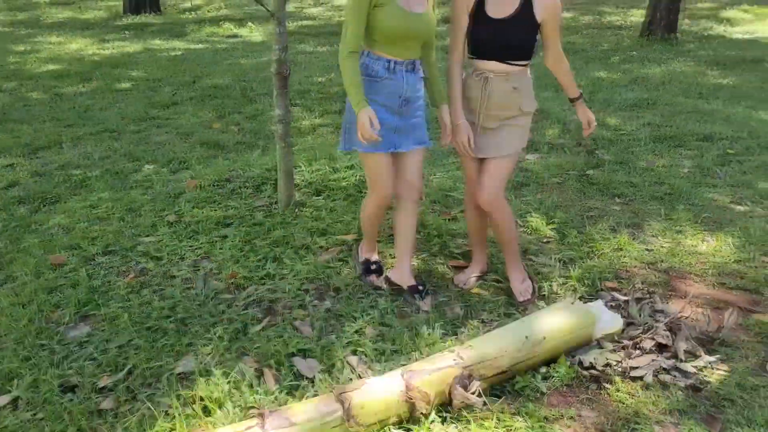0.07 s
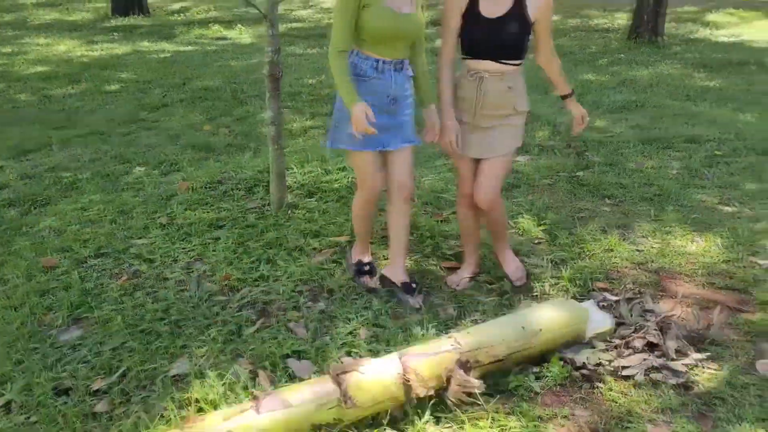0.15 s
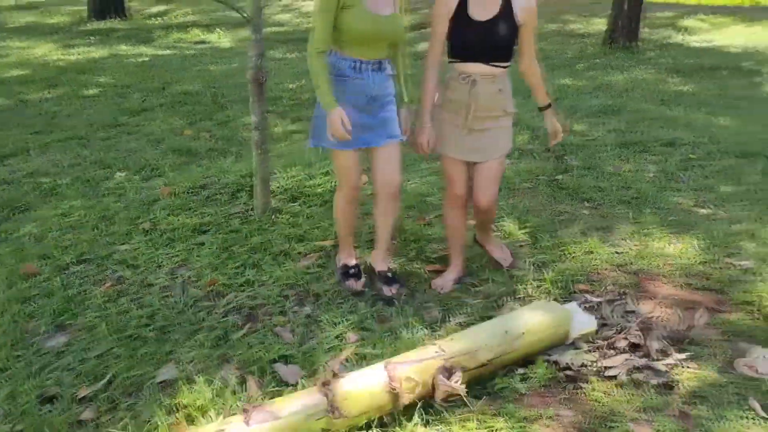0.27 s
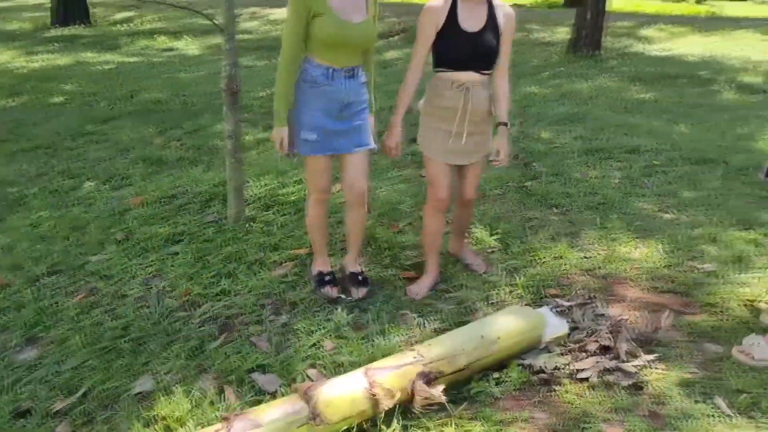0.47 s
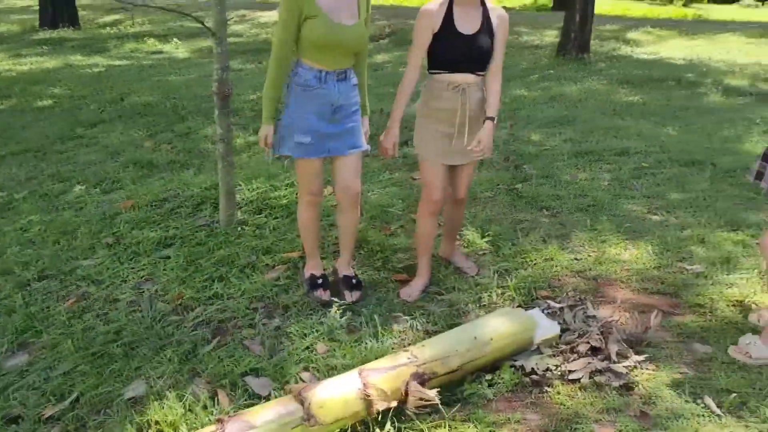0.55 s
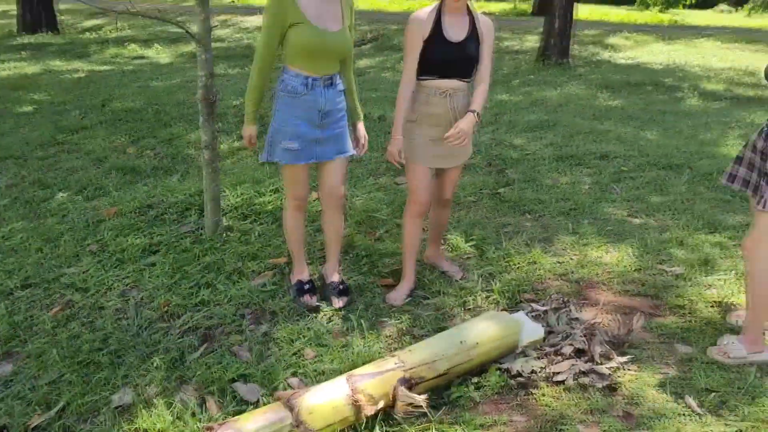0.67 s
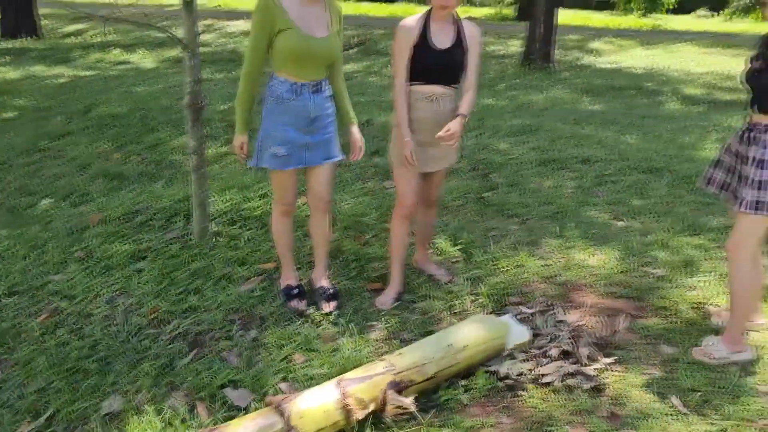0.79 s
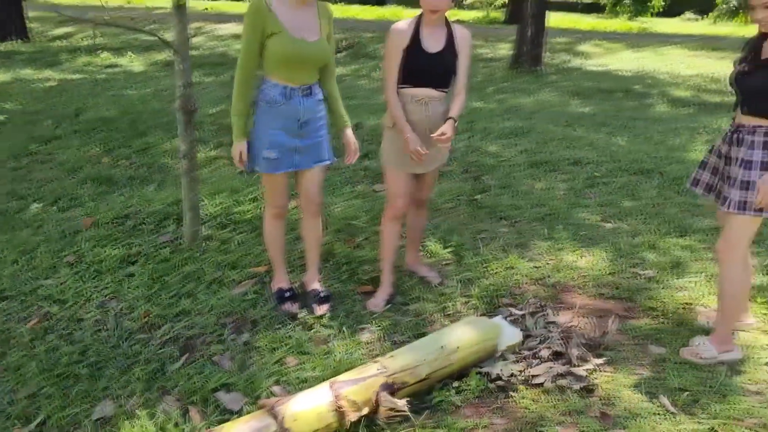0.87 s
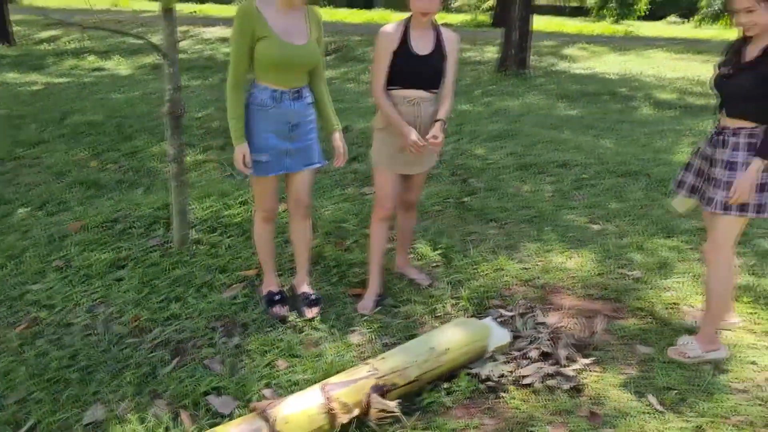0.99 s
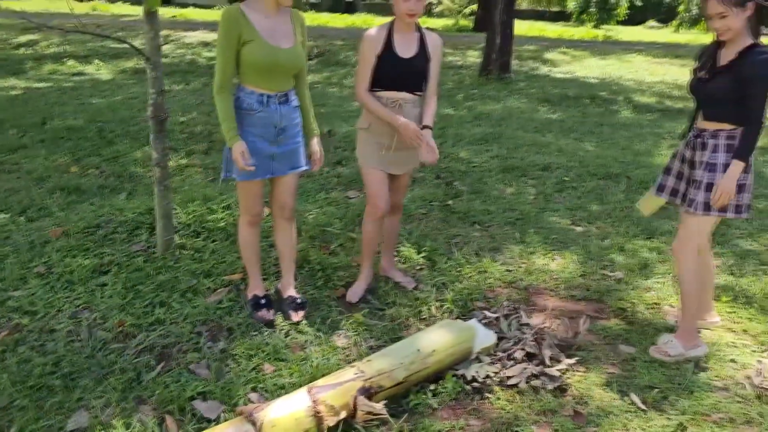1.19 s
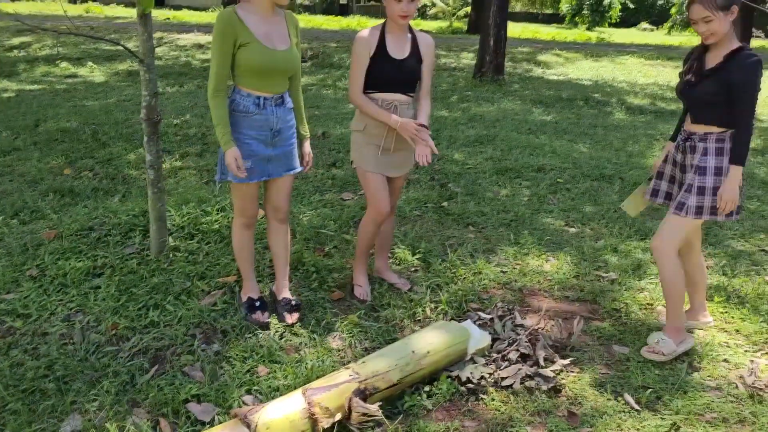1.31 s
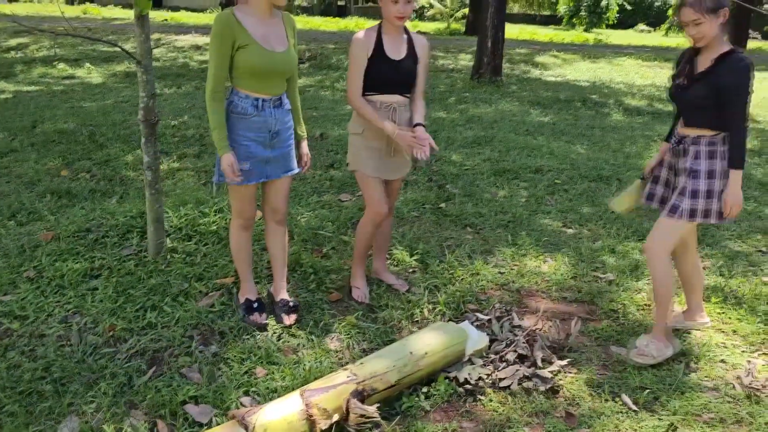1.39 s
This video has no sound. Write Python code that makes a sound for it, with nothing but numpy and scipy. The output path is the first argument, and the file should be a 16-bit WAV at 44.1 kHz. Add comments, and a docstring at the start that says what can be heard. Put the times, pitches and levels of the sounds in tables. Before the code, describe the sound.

A heavy cut trunk slides with a brief scrape, then thumps onto the ground at about 0.3 seconds, slightly left, in a quick cluster of hollow knocks. Dry leaves crackle and stems creak until it settles with a crisp slap at 0.5 seconds. The rustle fades by 0.8 seconds. A faint step brushes the grass around 1.2 seconds, while light wind rumbles on the microphone over a quiet outdoor background.

```python
"""Outdoors on grass and dry leaves, a heavy cut banana trunk slides and drops, a little to the left. Friction
excites its resonances; it then lands along its length in quick blows that push the ground, ring its damped
modes and knock its air cells. Crushed leaves crackle, stems creak, and a dry leaf breaks with a crisp snap. A
soft step brushes the grass afterwards; light wind rumbles on the microphone."""
import sys
import numpy as np
from scipy import signal
from scipy.fft import rfft, irfft
from scipy.io import wavfile

SR = 44100
rng = np.random.default_rng(int(sys.argv[2]) if len(sys.argv) > 2 else 0)


def unload_audio(sound):
    """Save the sound as a 16-bit wav file, at the path given as the first command line argument."""
    columns = np.transpose(np.atleast_2d(sound))
    # keep every value between -1 and 1, then stretch to whole-number steps
    steps = np.round(np.clip(columns, -1, 1) * 32767)
    wavfile.write(sys.argv[1], SR, steps.astype(np.int16))


N = 63945
T = np.arange(N) / SR
HZ = np.fft.rfftfreq(N, 1 / SR)
LEFT_LEAD_S, LEAD_SCATTER_S = .0004, .0003


def amp(db):
    """Decibels to amplitude ratio."""
    return 10 ** (np.asarray(db) / 20)


def unit(x):
    """Normalisation to rms 1."""
    return x / np.sqrt(np.mean(x ** 2) + 1e-20)


def spectrum(points):
    """Interpolation of a table over log frequency."""
    hz, value = np.transpose(points)
    return np.interp(np.log(HZ + 1), np.log(hz), value)


def envelope(points):
    """Gain over time, interpolated in decibels."""
    return amp(np.interp(T, *np.transpose(points)))


def filtered(x, gain):
    """Linear filtering: a product in the frequency domain."""
    return irfft(rfft(x) * gain, N)


def noise(points):
    """Two independent Gaussian noises of one spectrum."""
    return unit(filtered(rng.standard_normal((2, N)), amp(spectrum(points))))


def from_left(x):
    """Path difference: sound reaches the right microphone later."""
    return np.array([x, np.interp(T - LEFT_LEAD_S, T, x)])


def crackle(per_s, spread_db, wash):
    """Shot noise: random clicks over a smooth wash, from scattered directions."""
    sizes = amp(spread_db * np.minimum(rng.exponential(1, N), 4))
    clicks = sizes * rng.choice([-1, 1], N) * (rng.random(N) < per_s / SR)
    left = unit(clicks) + wash * rng.standard_normal(N)
    lag = np.round(SR * rng.normal(LEFT_LEAD_S, LEAD_SCATTER_S, N)).astype(int)
    right = np.bincount(np.clip(np.arange(N) + lag, 0, N - 1), left, N)
    return unit(np.array([left, right]))


# outdoor background: frequency_hz, density_db
AIR_SPECTRUM = [(20, -10), (38, -3), (54, 5), (75, -6), (130, -10), (250, -19), (500, -28), (1000, -38),
                (2000, -38), (5000, -38), (9000, -41), (11500, -39), (16000, -42)]
def air():
    """Diffuse field: distant rumble is coherent between the microphones, faint hiss hardly so."""
    left, independent = noise(AIR_SPECTRUM)
    coherence = spectrum([(30, .89), (250, .93), (700, .16), (1500, .029), (16000, .03)])
    right = filtered(left, coherence) + filtered(independent, np.sqrt(1 - coherence ** 2))
    return amp(-44) * np.array([left, right])


# rubbing before the drop: time_s, level_db
SLIDE_LEVELS = [(0, -37), (.045, -34.5), (.062, -35), (.084, -32), (.098, -28.5), (.116, -28), (.132, -30),
                (.165, -37.5), (.21, -38), (.27, -100)]
# resonances of the rubbed trunk: pitch_hz, width_hz, level_db
SLIDE_RESONANCES = [(594, 36, -4.5), (726, 38, -0.5), (758, 36, -4), (1182, 96, -8), (1300, 106, -5.5),
                    (1990, 340, -7.5), (2970, 500, -9)]
# grass brushed by trunk or foot: frequency_hz, density_db
GRASS_SPECTRUM = [(100, 4.5), (700, -2), (2000, 0), (3800, 4), (6000, -1), (9000, -8), (11500, -3.5),
                  (16000, -10.5)]
def slide():
    """Stick-slip friction: small slips excite the trunk's resonances while the grass hisses."""
    response = sum(amp(db) / np.sqrt(width) / (1 + 1j * (HZ - hz) / width) ** 2
                   for hz, width, db in SLIDE_RESONANCES)
    slips = crackle(per_s=1100, spread_db=2, wash=.52)
    end_s = SLIDE_LEVELS[-1][0]
    hiss = amp(-44.5) * np.clip((end_s - T) / .17, 0, 1) * noise(GRASS_SPECTRUM)
    return envelope(SLIDE_LEVELS) * unit(filtered(slips, response)) + hiss


def leaf_ticks(count=40, per_leaf_per_s=30, decay_cycles=20):
    """Damped free vibration: each leaf, struck at random, rings at its own pitch."""
    out = np.zeros((2, N))
    age = T[:3000]
    for hz in np.geomspace(1400, 13000, count):
        pitch = hz * rng.uniform(.94, 1.03)
        hits = (rng.random(N) < per_leaf_per_s / SR) * rng.standard_normal(N)
        lag_s = [[0], [rng.normal(LEFT_LEAD_S, LEAD_SCATTER_S)]]
        tick = np.exp(-age * hz / decay_cycles) * np.sin(2 * np.pi * pitch * (age - lag_s))
        out += hz * signal.oaconvolve(hits[None], tick, axes=1)[:, :N]
    return unit(out)


# crushing of the leaves: time_s, level_db
CRUSH_LEVELS = [(0, -55), (.18, -48), (.232, -27), (.254, -28.5), (.271, -17), (.295, -22.5), (.35, -22.5),
                (.41, -25.5), (.437, -29), (.478, -22), (.498, -23.5), (.518, -20), (.56, -30.5),
                (.60, -36.5), (.67, -43.5), (.78, -47.5), (.9, -57), (1.45, -65)]
# leaf crackle: frequency_hz, density_db
LEAF_SPECTRUM = [(60, 0.5), (200, 5), (500, 2.5), (800, 0), (1100, -3.5), (2000, -0.5), (3200, -4),
                 (5000, -5), (7000, -9), (9500, -12), (11700, -8.5), (13500, -11.5), (16000, -10)]
# its stereo balance: frequency_hz, left_minus_right_db
LEAF_BALANCE = [(100, 1), (2000, 2), (5000, 2), (8000, 5), (15000, 6.5)]
def leaves():
    """Buckling: leaves and grass crackle under the trunk's weight and spring back."""
    balance = amp(np.outer([.5, -.5], spectrum(LEAF_BALANCE)))
    grains = crackle(per_s=3500, spread_db=.5, wash=.44) + amp(-9.5) * leaf_ticks()
    return envelope(CRUSH_LEVELS) * unit(filtered(grains, amp(spectrum(LEAF_SPECTRUM)) * balance))


# puffs of wind: centre_s, sigma_s, level_db
WIND_PUFFS = [(0.158, 0.03, -27), (0.721, 0.023, -39.5), (0.831, 0.041, -41.5), (0.952, 0.017, -32),
              (1.194, 0.011, -42), (1.229, 0.036, -30.5), (1.306, 0.018, -28), (1.44, 0.047, -31)]
# wind rumble: frequency_hz, density_db
WIND_SPECTRUM = [(20, -15), (45, 10), (110, 6), (190, -14.5), (300, -17), (600, -86), (2000, -74),
                 (16000, -90)]
def wind(coherence=.68, left_db=-8.5):
    """Turbulent pressure: puffs buffet mostly the right microphone."""
    gusts = sum(amp(db) * np.exp(-.5 * ((T - s) / sigma) ** 2) for s, sigma, db in WIND_PUFFS)
    independent, right = noise(WIND_SPECTRUM)
    left = coherence * right + np.sqrt(1 - coherence ** 2) * independent
    return gusts * np.array([amp(left_db) * left, right])


# blows of the trunk on the ground: start_s, level_db, contact_ms
TRUNK_BLOWS = [(0.228, -16, 2.9), (0.2379, -9, 4.6), (0.254, -12, 2.2), (0.2642, -4, 4.8),
               (0.2685, -3, 1.83), (.2740, -8, 1.18), (0.2773, 2, 0.75), (0.2845, -22, 1.4),
               (0.2892, -13, 2.94), (.2980, -12, 2.4), (.3210, -9, 2.9), (.3320, -9.5, 2.3),
               (0.3668, -15.5, 7.7), (0.4469, -19.5, 6.4), (.4735, -16, 1.4), (.4990, -19.5, 2),
               (0.517, -25, 4.1)]
# modes of the wet trunk: pitch_hz, level_db, t60_s
TRUNK_MODES = [(81.3, -17.5, 0.16), (158.7, -23, 0.27), (226.1, -14.5, 0.34), (250, -29, 0.46),
               (293.4, -19, 0.33), (422, -28, 0.26), (575, -17.5, 0.2), (665.7, -14, 0.11),
               (784, -8.5, 0.078), (876, -4, 0.075), (1330, -27, .05)]
# dull crunch of the soil: frequency_hz, density_db
SOIL_SPECTRUM = [(25, 3.5), (60, 1.5), (130, -17), (280, 7), (450, -10), (750, 1), (1100, -5), (3000, -37),
                 (16000, -66)]
def thump(ground_hz=43.4, ground_t60_s=.16, soil_t60_s=.17):
    """Impact excitation: each force pulse pushes the ground, rings the trunk and crunches the soil."""
    push, drive, crunch_power = np.zeros((3, N))
    for start, db, contact_ms in TRUNK_BLOWS:
        pulse = np.sin(np.pi * np.clip((T - start) / (contact_ms / 1000), 0, 1)) ** 2
        push += amp(db) * pulse
        drive += amp(db) * pulse / pulse.sum()
        crunch_power += (T > start) * amp(db - 60 * abs(T - start) / soil_t60_s) ** 2
    push = signal.lfilter(*signal.butter(1, 70, "high", fs=SR), push)
    modes = sum(amp(db - 60 * T / t60) * np.sin(2 * np.pi * hz * T) for hz, db, t60 in TRUNK_MODES)
    ground = amp(-25.5 - 60 * T / ground_t60_s) * np.sin(2 * np.pi * ground_hz * T)
    ringing = signal.fftconvolve(drive, amp(-6.5) * modes + ground)[:N]
    crunch = np.sqrt(crunch_power) * noise(SOIL_SPECTRUM)[0]
    return from_left(amp(-4) * push + ringing + amp(-14) * crunch)


# hollow knock of the trunk: frequency_hz, density_db
KNOCK_SPECTRUM = [(100, -13), (400, -3), (580, 15.5), (850, -5.5), (1100, -35), (2000, -24), (3600, -10),
                  (6000, -23), (16000, -50)]
def knock(t60_s=.024):
    """Cavity resonance: the trunk's air cells answer short, hard blows most strongly."""
    power = sum((T > start) * amp(db - 60 * abs(T - start) / t60_s) ** 2 / contact_ms ** 2
                for start, db, contact_ms in TRUNK_BLOWS)
    return from_left(amp(-15) * np.sqrt(power) * noise(KNOCK_SPECTRUM)[0])


# creaks of stiff leaves and stems: centre_s, pitch_hz, level_db, sigma_s
STEM_CREAKS = [(0.281, 3900, -21.5, 0.0046), (0.346, 1880, -29, 0.016), (0.355, 4210, -31, 0.013),
               (0.528, 2700, -32, 0.0046), (.557, 2640, -34, 0.0051), (1.19, 4080, -52, .009),
               (1.331, 3170, -58, 0.0065)]
def creaks(sigma_hz=210):
    """Friction-driven resonance: a bent stem rubs and rings briefly in a narrow band."""
    out = np.zeros(N)
    for centre, hz, db, sigma in STEM_CREAKS:
        band = np.exp(-.5 * ((HZ - hz) / sigma_hz) ** 2)
        tone = unit(filtered(rng.standard_normal(N), band))
        out += amp(db) * np.exp(-.5 * ((T - centre) / sigma) ** 2) * tone
    return from_left(out)


# breaking leaves: start_s, level_db, decay_s, left_minus_right_db
LEAF_SNAPS = [(.349, -47, 0.0022, 0), (0.5121, -14.5, 0.0068, 5.5), (0.621, -33, .003, 2),
              (1.2465, -41, 0.0024, -4)]
# one crisp snap: frequency_hz, density_db
SNAP_SPECTRUM = [(100, -12), (700, 1), (2500, 5.5), (6000, -3.5), (9000, 2), (11700, 5), (14000, -8),
                 (16000, 2)]
def snaps(rise_s=.00074):
    """Brittle fracture: single dry leaves break with a short, bright burst."""
    out = np.zeros((2, N))
    for start, db, decay, side_db in LEAF_SNAPS:
        age = np.maximum(T - start, 0)
        burst = np.minimum(age / rise_s, 1) * np.exp(-age / decay)
        out += amp(db + side_db * np.array([[.5], [-.5]])) * burst * noise(SNAP_SPECTRUM)
    return out


# a soft step: time_s, level_db
STEP_LEVELS = [(1.06, -82), (1.15, -53), (1.185, -51.5), (1.225, -55), (1.255, -52.5), (1.305, -55),
               (1.335, -50), (1.37, -62.5), (1.45, -76)]
def step():
    """Friction noise: a foot brushes through grass, and many small contacts merge."""
    contacts = crackle(per_s=4100, spread_db=5, wash=1.0)
    return envelope(STEP_LEVELS) * unit(filtered(contacts, amp(spectrum(GRASS_SPECTRUM))))


def scene():
    """Superposition: the pressures of all sources add in the open air."""
    return air() + slide() + leaves() + wind() + thump() + knock() + creaks() + snaps() + step()


def record(dry, port_hz=11450, half_width_hz=190, ceiling=.88, knee=6, cutoff_hz=15950):
    """Transduction: the microphone port resonates, peaks saturate softly, a low-pass limits the band."""
    port_db = 3.5 / (1 + ((HZ - port_hz) / half_width_hz) ** 2)
    heard = filtered(dry, amp(port_db))
    saturated = heard / (1 + abs(heard / ceiling) ** knee) ** (1 / knee)
    lowpass = signal.firwin(511, cutoff_hz, window=("kaiser", 9), fs=SR)
    return signal.oaconvolve(saturated, lowpass[None], "same")


dry = scene()
out = record(dry)
unload_audio(out)
```